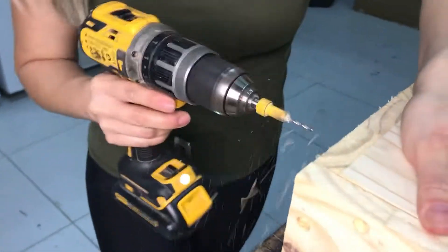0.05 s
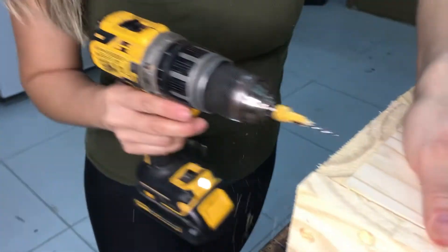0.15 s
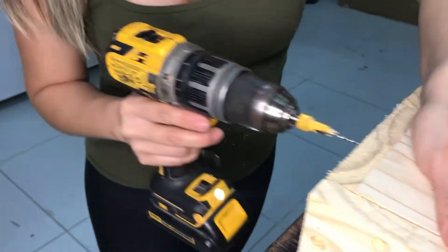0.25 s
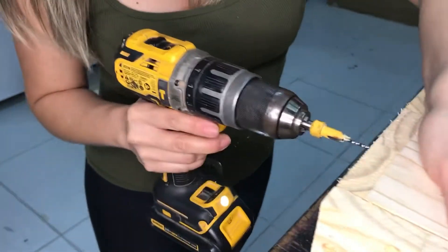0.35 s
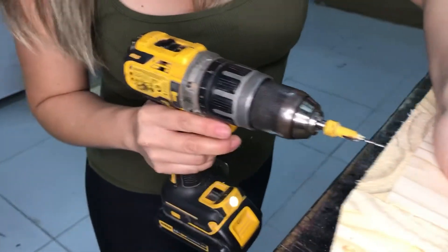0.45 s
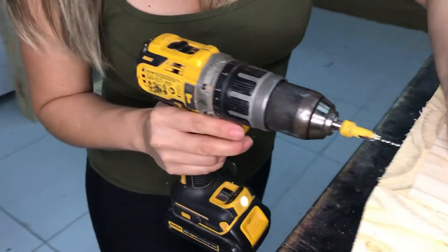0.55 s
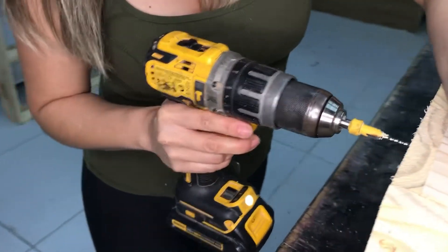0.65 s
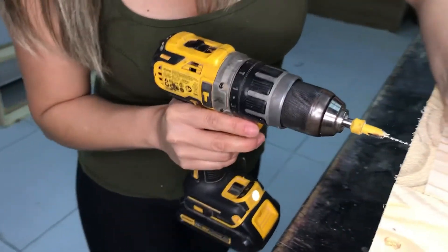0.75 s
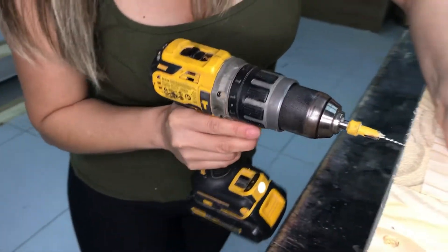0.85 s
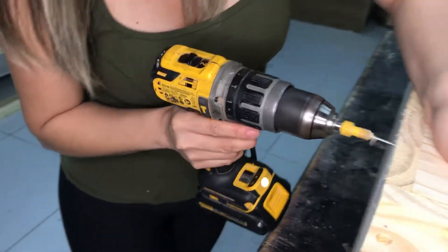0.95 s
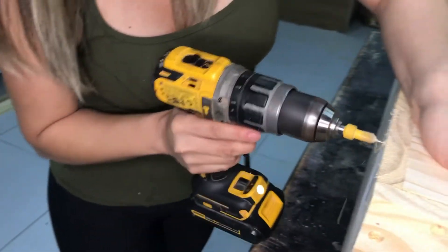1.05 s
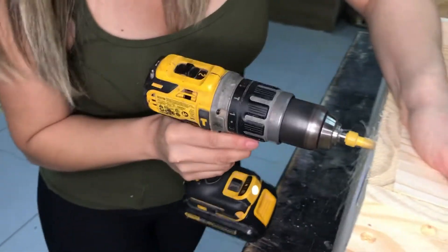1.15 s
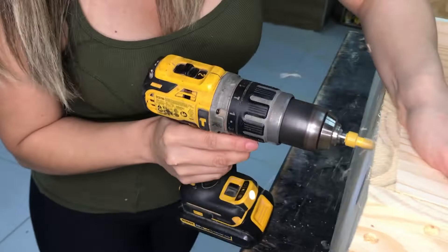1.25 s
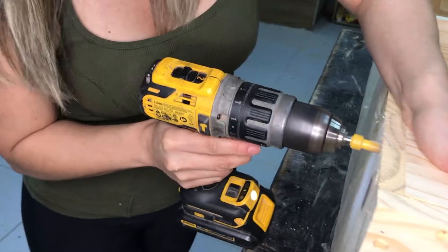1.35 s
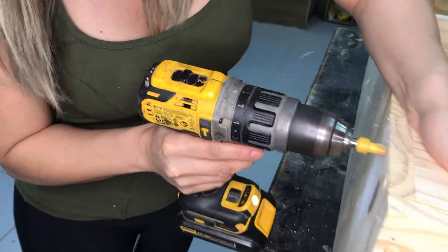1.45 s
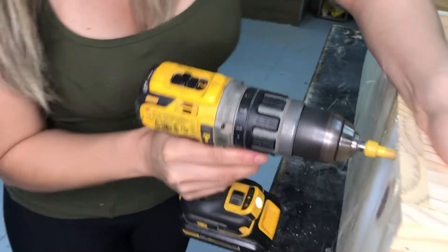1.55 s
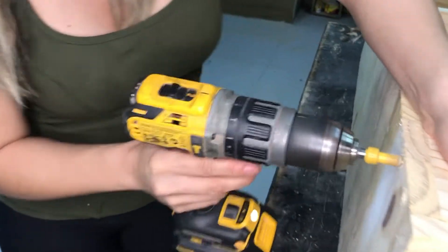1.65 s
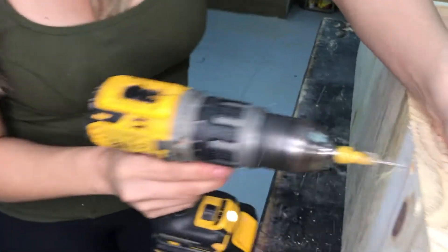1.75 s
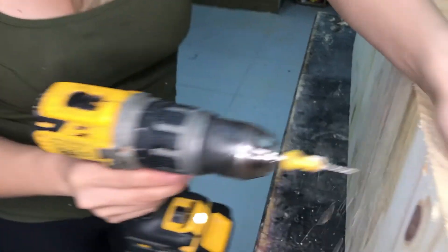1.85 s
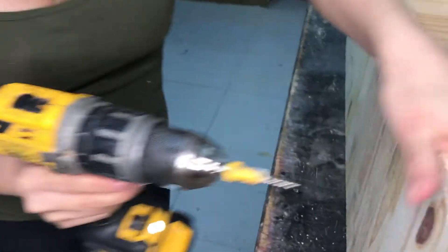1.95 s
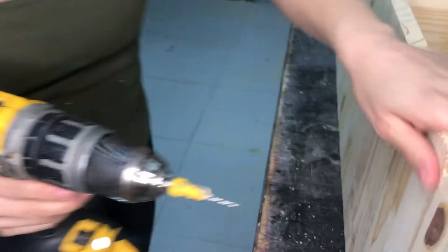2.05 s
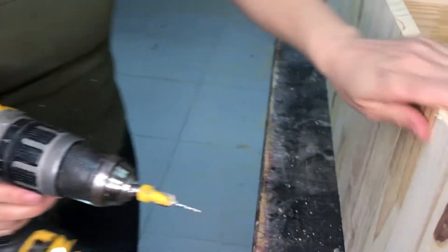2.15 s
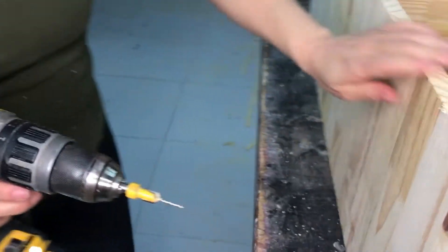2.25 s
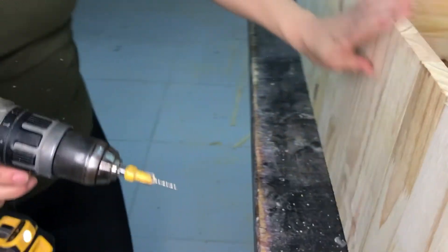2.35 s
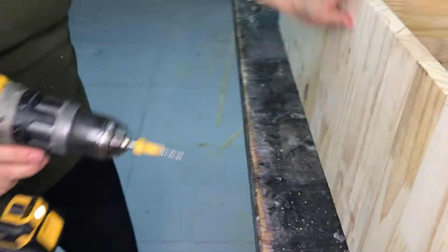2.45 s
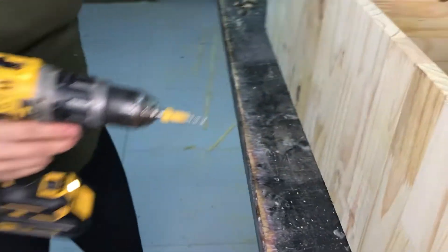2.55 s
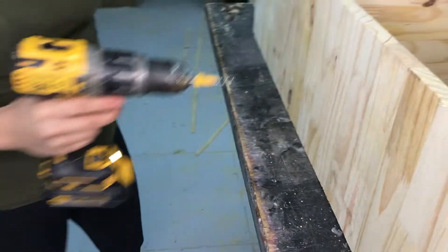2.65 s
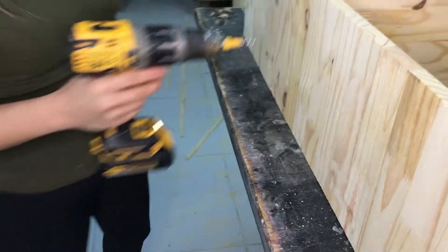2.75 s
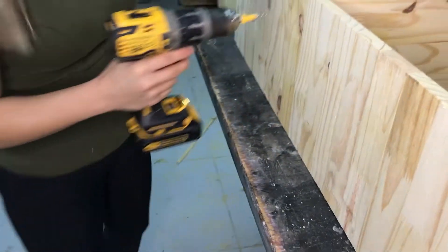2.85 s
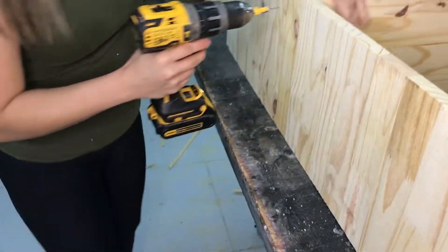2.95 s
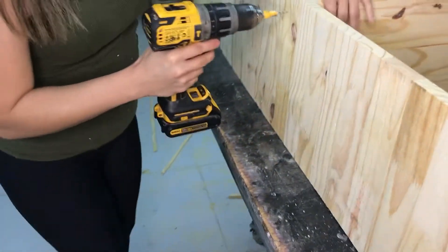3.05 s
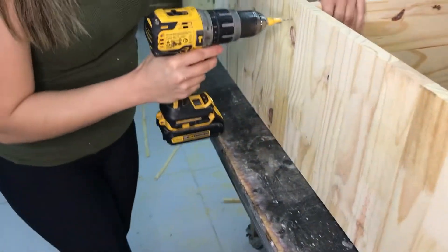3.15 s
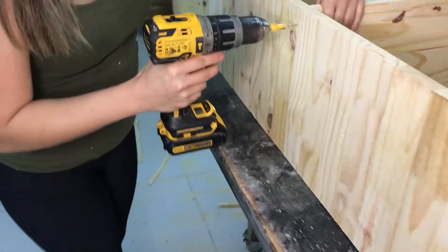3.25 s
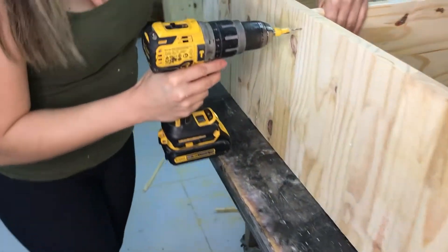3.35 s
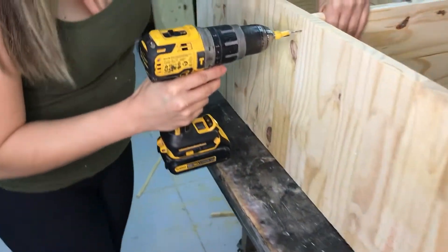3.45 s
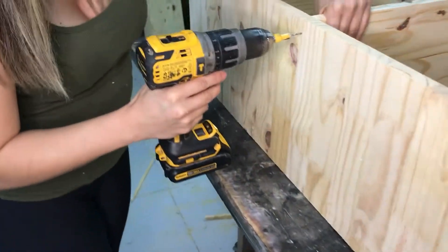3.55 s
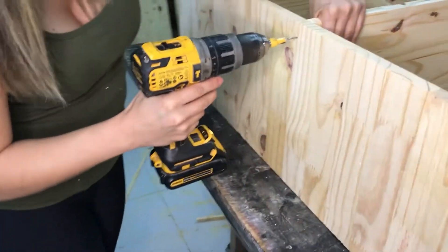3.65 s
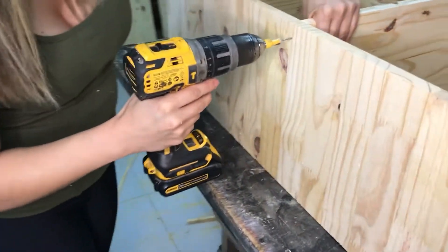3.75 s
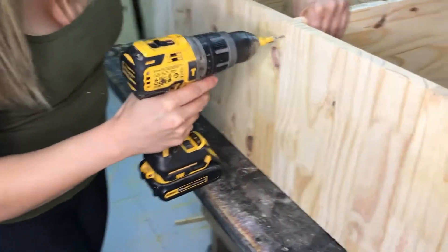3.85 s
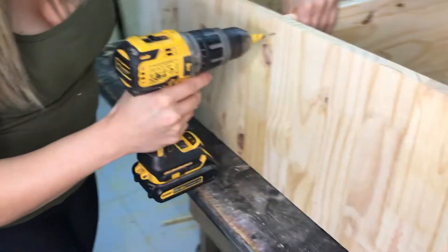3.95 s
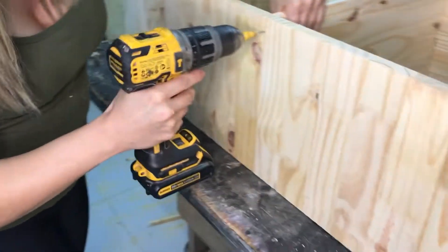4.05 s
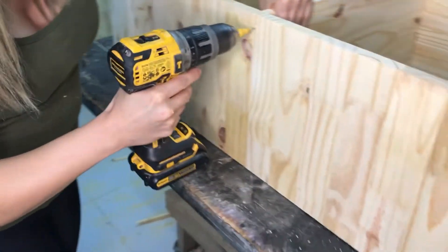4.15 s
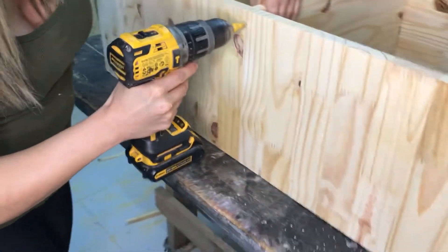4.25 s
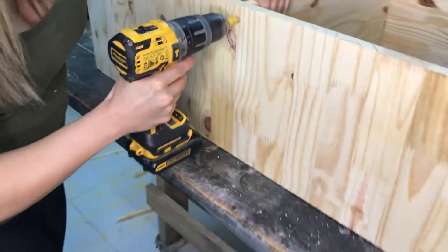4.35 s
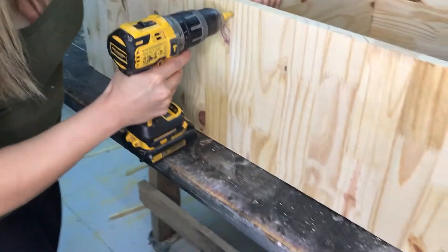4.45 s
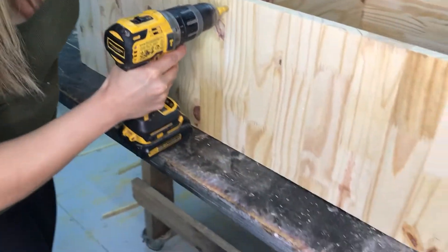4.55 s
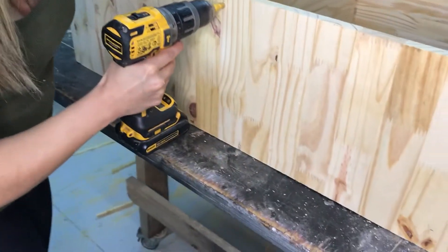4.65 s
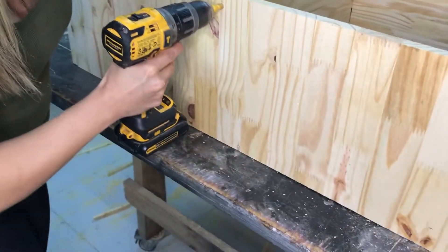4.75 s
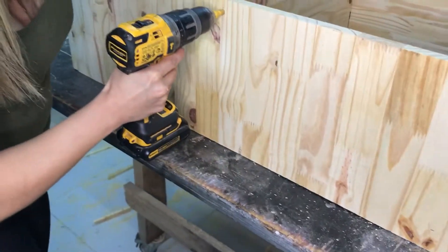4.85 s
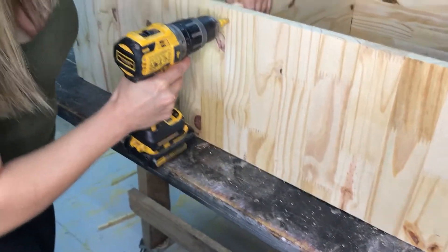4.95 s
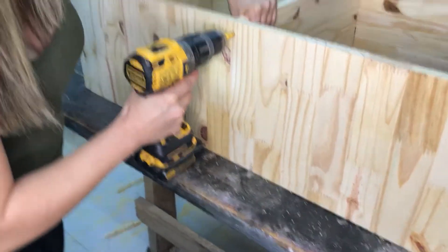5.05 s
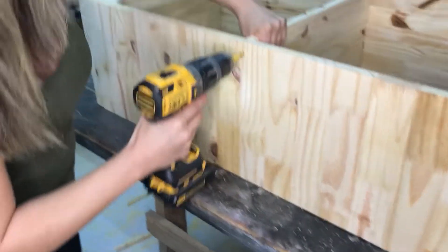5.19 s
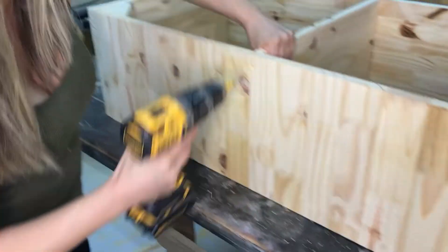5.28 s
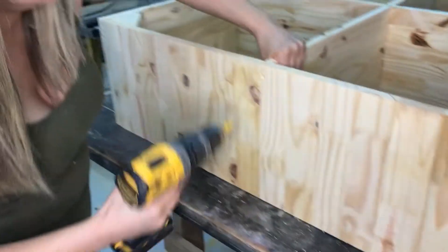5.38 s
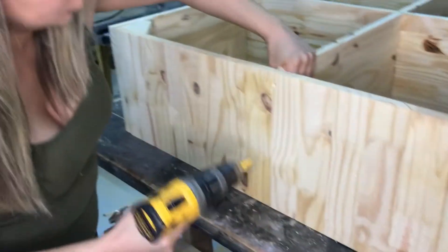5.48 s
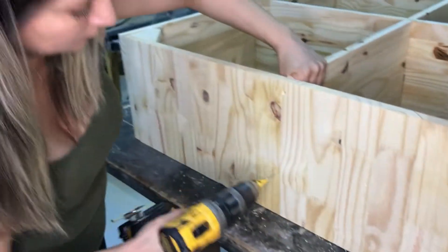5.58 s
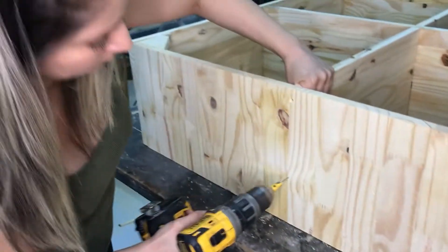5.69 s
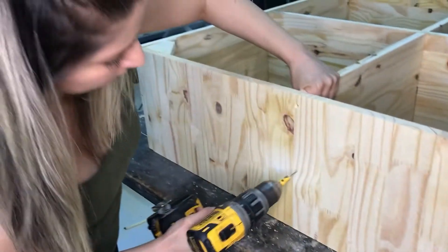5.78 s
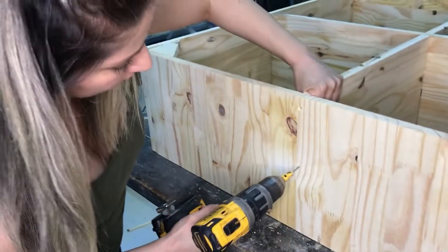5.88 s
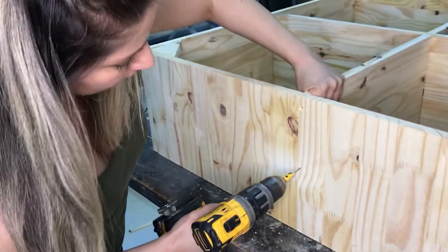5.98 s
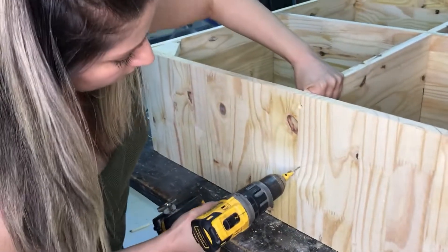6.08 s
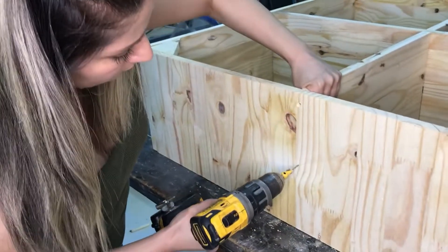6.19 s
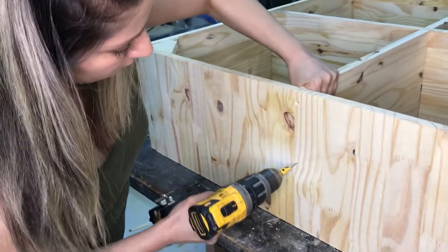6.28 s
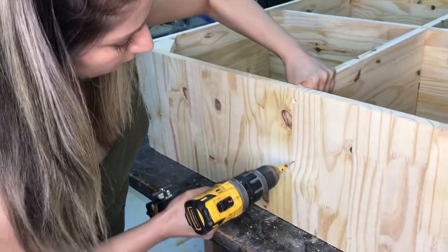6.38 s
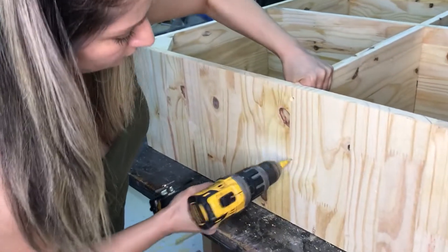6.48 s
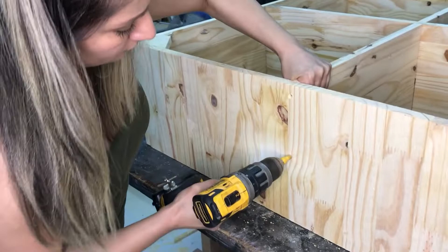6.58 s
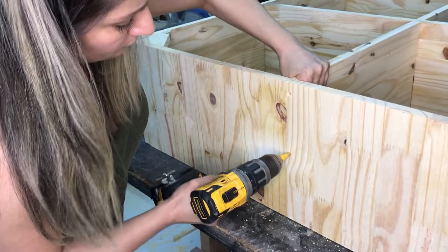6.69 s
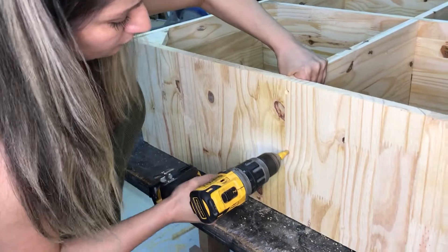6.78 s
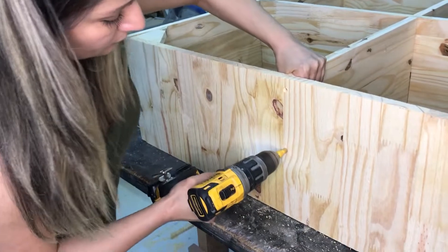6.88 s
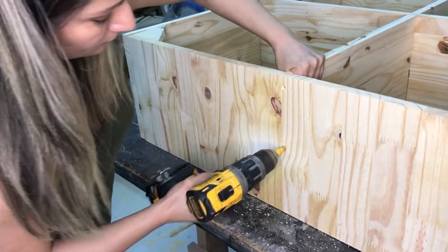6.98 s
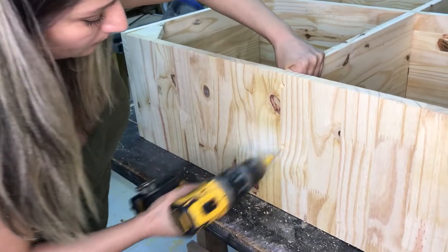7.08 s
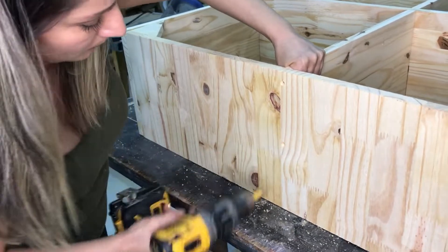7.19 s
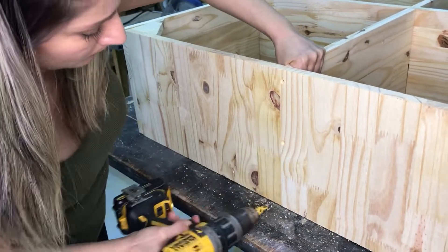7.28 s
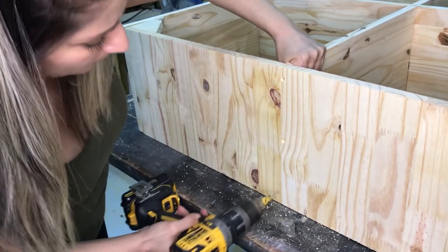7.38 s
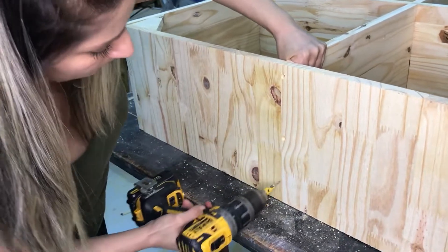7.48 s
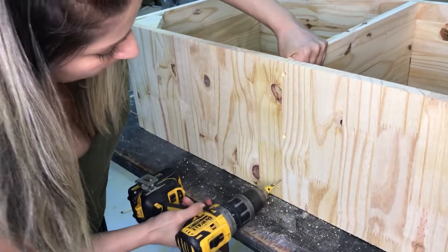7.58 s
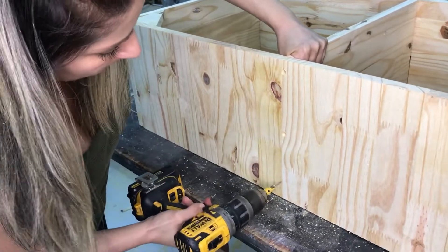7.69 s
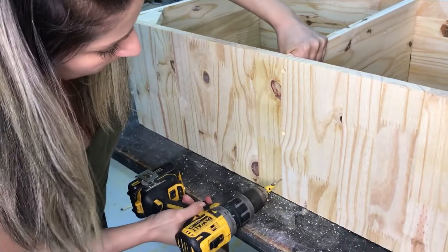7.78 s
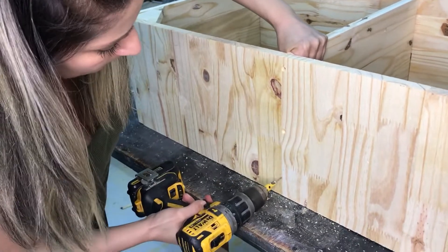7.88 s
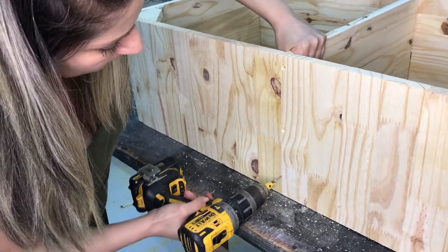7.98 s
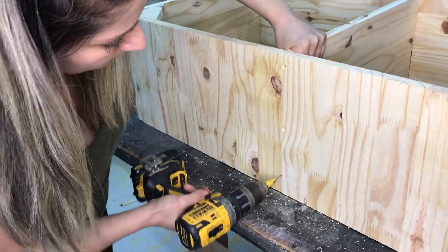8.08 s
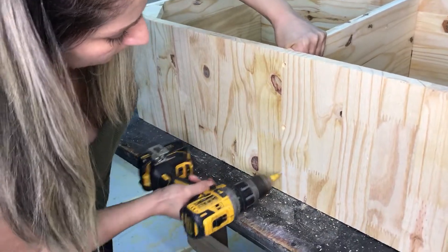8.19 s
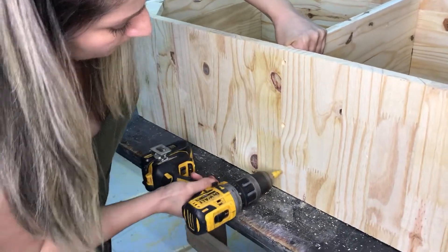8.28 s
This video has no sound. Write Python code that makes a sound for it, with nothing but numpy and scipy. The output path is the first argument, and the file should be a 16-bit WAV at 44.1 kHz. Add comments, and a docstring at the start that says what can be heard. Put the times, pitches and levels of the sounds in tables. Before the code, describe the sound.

Close in a workshop with faint steady room noise and sparse reflections, a cordless drill is just stopping: a dying whine and several clacks within 0.2 s. Soft rubs and light bit taps on wood follow. At 0.9 s it clicks and spins up in about a tenth of a second to a high thin whine over bright gritty gear rattle, biting strongest here, the boards buzzing low, until 1.65 s; loud clustered clacks end it by 1.83. Hand and shoe scuffs fill 2 to 3.8, with a wooden tap at 3.83. A longer, fuller rattling bore runs 3.9-5.2, stopping in hard knocks. Quiet scuffs, a tap at 6.23, then a shorter bore 6.35-7.05 with stop clacks to 7.25. A barely audible thin tone sags slightly from 7.55 to 8.03. After a tap at 7.95, the drill starts again at 8.03 and is still whining at the end.

```python
"""First comes the dying spin of a cordless drill, which then bores short holes into a pine cabinet.
The motor whines as sinusoids on its shaft orders, over gear rattle made of noise shaped by resonances.
The bit shakes the boards through panel modes, and the spindle lock clacks at each start and stop.
Hands and shoes scuff, the bit is set against the boards, and a faint thin tone sounds late on.
Sparse workshop reflections and steady room noise surround it all at one microphone."""
import sys
import numpy as np
from scipy import signal
from scipy.io import wavfile
from scipy.ndimage import uniform_filter1d

SR = 44100
rng = np.random.default_rng(int(sys.argv[2]) if len(sys.argv) > 2 else 0)


def dump_mix(stems):
    """Bounce the given channels to the path in sys.argv[1] as a 16-bit WAV at rate SR."""
    frames = np.atleast_2d(stems).T  # one column per channel
    limited = np.clip(frames, -1, 1)  # hard clip at full scale
    pcm = np.round(limited * 32767).astype(np.int16)
    wavfile.write(sys.argv[1], SR, pcm)


def field_ratio(decibels):
    """Amplitude ratio for a level in dB (20 dB per decade); scalars and array-likes work."""
    return 10 ** (np.asarray(decibels, dtype=float) / 20)


N = 367353  # samples

# Motor speed until the brake, one list per spin.
# Each row: time in seconds, mesh whine in Hz, whine level in dB before flare and flutter.
SPINS = [
    [(0, 10600, -36)],
    [(.94, 5500, -38), (.968, 6747, -38), (1.0, 9240, -28), (1.03, 10919, -24), (1.06, 11262, -23),
     (1.126, 11557, -29), (1.16, 11323, -30), (1.25, 11680, -23), (1.39, 11906, -22), (1.53, 11959, -24),
     (1.59, 12158, -28), (1.63, 12750, -26), (1.662, 11650, -28)],
    [(3.95, 3800, -50), (3.99, 6364, -38), (4.018, 9003, -29), (4.044, 10600, -28), (4.07, 11290, -28),
     (4.146, 11730, -28), (4.35, 11770, -30), (4.46, 11890, -25), (4.604, 11957, -27), (4.66, 11721, -32),
     (4.88, 11823, -32), (4.968, 11464, -24), (5.084, 11593, -32), (5.148, 12503, -24), (5.182, 11607, -29)],
    [(6.39, 4000, -50), (6.42, 5924, -41), (6.45, 7544, -33), (6.48, 9963, -29), (6.5, 10750, -30),
     (6.52, 11095, -30), (6.6, 11186, -29), (6.694, 11474, -24), (6.816, 11639, -26), (6.924, 11667, -25),
     (6.98, 11953, -29), (7.03, 12600, -28), (7.066, 11062, -28)],
    [(8.1, 4000, -54), (8.15, 6800, -40), (8.18, 8300, -36), (8.2, 8850, -29), (8.222, 9850, -30),
     (8.246, 10500, -29), (8.27, 10780, -24), (8.33, 11008, -24)],
]
TEETH = 23  # whine cycles per turn of the motor shaft
SHAFT_JITTER = .00087  # rms fraction of the speed
BRAKE_HZ_PER_S, BRAKE_S = 76000, .07  # fall of the whine under the brake
CREEP_HZ_PER_S, CREEP_S = 52000, .08  # slower fall after it
BRAKE_DB, BRAKE_POLE_DB = -8, -5  # fading of the whine, and of the pole orders re run-up

# Magnetic and gear orders of the motor.
# Each row: multiple of the shaft rate, level in dB re the pole level, flare at the housing's sharp ring in dB.
POLES = [(8, 0, 8), (4, -3, 0), (12, -11, 14), (3, -10, 0), (16, -14, 21), (10.5, -22, 27)]
# Pole orders, one row per spin.
# Each row: run-up in seconds, level at its end in dB, level at full speed in dB, lift of the fourth order in dB.
POLE_LEVELS = [(.01, -36, -36, 0), (.09, -35, -34, 2.5), (.07, -34, -34, -3), (.07, -35, -48, 3),
               (.12, -36, -37, 0)]
POLE_START_DB, POLE_SETTLE_S = -5, .09  # start re the end of the run-up; time to settle after it
SLOW_POLE_DB, FULL_HZ = 16, 10800  # away from the ring: loss per octave of whine below FULL_HZ
FLARE_HZ, FLARE_WIDTH_HZ, WHINE_FLARE_DB = 3580, 290, 11  # the housing's sharp ring

# Load on the bit, one list per pull.
# Each row: time in seconds, bite of the bit in the wood in dB, hum of the shaft order in dB.
LOADS = [
    [(0, -42, -70), (.09, -45, -70), (.2, -62, -70)],
    [(.897, -50, -68), (.98, -44, -62), (1.035, -24.5, -53), (1.13, -26, -53), (1.24, -27.5, -36),
     (1.34, -33, -38), (1.54, -28, -39), (1.66, -28, -52), (1.84, -40, -60), (1.88, -55, -60)],
    [(3.895, -44, -60), (3.98, -49, -52), (4.06, -42, -38), (4.16, -40, -32), (4.56, -40, -32.5),
     (4.7, -34, -32), (4.86, -40, -30), (4.96, -33, -34), (5.17, -40, -36), (5.31, -43, -62),
     (5.4, -59, -62)],
    [(6.347, -49, -66), (6.43, -49, -64), (6.52, -39, -56), (6.6, -33, -39), (6.8, -34, -40),
     (6.92, -36, -44), (7.02, -38, -33), (7.15, -42, -64), (7.28, -58, -64)],
    [(8.027, -45, -70), (8.13, -48, -62), (8.2, -32, -55), (8.26, -32, -54), (8.34, -33, -44)],
]
GRAB_DB, GRAB_SPAN_DB = -45, 10  # bite at which the bit begins to grab, and range to full grab
GRAB_TURNS, GRAB_FLUTTER_DB, GRAB_PULSE = .13, 2, .7  # phase jolt, level flutter, throb once a cut
CUTS_PER_TURN = .0812  # bites of the bit per turn of the motor shaft, through the gears

# Trigger pulls of the drill.
# Each row: squeeze in seconds, run-up in seconds, release in seconds,
# nominal gear rattle at first in dB, nominal rattle at full speed in dB.
PULLS = [(-1, .14, -.04, -40, -28), (.897, .12, 1.65, -31, -22), (3.895, .11, 5.17, -36, -23),
         (6.347, .13, 7.04, -40, -23), (8.027, .15, 9, -41, -21.5)]
SURGE_DB, SETTLE_S = 2, .15  # overshoot of the rattle at the end of the run-up
COAST_S, COAST_DB, HALT_S, HALT_DB = .19, -11, .045, -18  # sag while braking, then the halt
SLOW_TREBLE_DB, SLOW_HOUSING_DB = -9.5, 8.7  # slow gears are dull and boom in the housing
# Colour of the rattle as the drill is held, one list per pull. Each row: frequency in Hz, density in dB per Hz.
RATTLE = [
    [(350, -20), (600, -9), (1020, -9), (2160, -12.5), (2370, -11.5), (3920, -8), (4750, -16.5),
     (7040, -16), (15500, -28)],
    [(350, -20), (600, -10), (766, -13), (915, -7.5), (1180, -9.5), (1560, -6), (2160, -6), (2400, -4),
     (3820, -5), (4370, -4), (4940, -8.5), (6490, -5.5), (10600, -10), (11600, -9), (15500, -12)],
    [(100, -24), (350, -7), (600, -4.5), (1050, -8.5), (1530, -0.5), (2190, -2.5), (2400, 1), (3770, -0.5),
     (4200, 1), (4940, -4.5), (5980, -0.5), (7640, -3), (8630, -2), (10600, -6.5), (11600, -5),
     (15500, -9.5)],
    [(350, -35), (600, -8), (716, -21), (878, -15), (1220, -21.5), (1530, -12), (2220, -11), (2950, -7.5),
     (4090, -11), (4620, -10), (7740, -15.5), (9240, -13), (10300, -19), (11600, -16.5), (15500, -20.5)],
    [(350, -21), (600, -6.5), (1150, -16), (1380, -7), (2220, -7), (2400, -3), (3660, -1), (4260, -3.5),
     (7430, -7), (11000, -11), (15500, -15)],
]
# Main resonance of the gear housing. The row: frequency in Hz, width in Hz.
HOUSING = (3800, 540)
# Narrow resonances of the plastic shell. Each row: frequency in Hz, width in Hz, lift in dB.
SHELL = [(922, 69, 4), (1533, 60, 2.5), (2190, 70, -4.5), (2466, 44, 3.5), (2480, 40, -0.5), (3000, 78, 2),
         (3180, 50, 4.5), (3490, 74, 4.5), (3790, 48, 2.5), (4470, 90, 2.5), (4750, 70, 1),
         (6300, 150, 2.5), (8500, 200, 2)]
PATCHY_DB = 1.8  # rms swell of narrow rattle bands

# Cabinet panels shaken by the bit, one list per pull.
# Each row: frequency in Hz, width of the first resonator in Hz, relative level in dB.
PANELS = [
    [(90, 40, -10), (210, 60, 6), (600, 180, -8)],
    [(78, 33, -14), (206, 30, -0.5), (315, 31, -8.5), (566, 170, -7.5)],
    [(90, 32, -19), (177, 60, -8), (576, 110, 15)],
    [(98, 16, -4), (196, 55, -1), (497, 250, 6)],
    [(107, 32, -12), (195, 95, 0.5), (532, 130, 0)],
]
# Beat of the cutting edges, one list per pull. Each row: multiple of the cut rate, level in dB re the bite.
BEATS = [
    [],
    [(2, -11), (3, -27), (4, -13), (5, -13), (6, -12.5), (8, -13.5), (10, -16), (11, -16), (14, -11)],
    [(2, -12), (3, -26), (4, -4), (5, -24), (6, -6.5), (8, -20), (14, -10.5), (15, -10.5)],
    [(2, -10), (4, -4.5), (6, -5), (8, -15), (13, -13)],
    [(3, -10), (5, -5.5), (7, -11.5), (14, -10.5)],
]

# Steady room noise. Each row: frequency in Hz, relative density in dB per Hz.
AIR = [(18, -53), (26, -14), (32, 3), (50, -8.5), (120, -9.5), (309, -18), (371, -20.5), (508, -16.5),
       (677, -17), (1090, -20), (1240, -26), (1450, -21), (1690, -22), (2260, -19), (4960, -23),
       (5800, -23.5), (15700, -34.5)]
AIR_DB = -47.6  # rms
# Decay of the workshop reflections. Each row: frequency in Hz, t60 in seconds.
SHOP = [(100, 0.15), (500, 1), (1500, 1), (4000, 0.77), (8000, 0.74), (14000, 0.3)]
SHOP_DB = -12.5  # energy of the reflections re the direct sound

# Knocks of gear play and spindle lock. Each row: start in seconds, peak in dB.
CLACKS = [(.009, -13), (.068, -15), (.108, -19), (.177, -30), (.8965, -20), (.944, -18), (1.684, -9),
          (1.713, -9), (1.719, -8), (1.7495, -6), (1.8075, -5), (1.829, -22), (3.88, -31), (3.896, -25),
          (5.225, -12), (5.2525, -6), (5.288, -13), (5.309, -18), (6.346, -27), (6.402, -19), (7.091, -14),
          (7.116, -8), (7.123, -12), (7.151, -7), (7.196, -19), (7.205, -10.5), (7.228, -21), (8.027, -25),
          (8.05, -24)]
# Knocks that set the chuck steel ringing.
# Each row: start in seconds, peak in dB, gain of the steel modes against the gearbox modes in dB.
PINGS = [(.9115, -12, 0), (3.914, -17, 3), (6.367, -13, -15), (7.2455, -16, -17)]
CLACK_S, CLACK_STEEL_DB, PING_S = .003, -29, .0025  # impact decay, steel gain, ping impact decay
# Modes of the damped gearbox. Each row: frequency in Hz, level in dB, t60 in seconds.
GEARBOX = [(1600, -11, .005), (2000, -6, .006), (2600, -3, .006), (3100, -1, .007), (3600, 0, .008),
           (4200, 0, .006), (5000, -3, .004), (6000, -2, .004), (7000, -2, .003), (8500, -3, .003),
           (10500, -5, .002), (13000, -8, .002)]
# Modes of the chuck steel. Each row: frequency in Hz, level in dB, t60 in seconds.
STEEL = [(7550, -5, .04), (10030, 0, .08), (11770, -1, .05)]

# Rubs of hands and shoes.
# Each row: start in seconds, nominal peak in dB, centre in Hz, decay constant in seconds.
SCUFFS = [(.30, -42, 3800, .093), (.84, -44, 4270, .08), (2.02, -40, 2500, .06), (2.16, -39.5, 2400, .08),
          (2.17, -41, 990, .06), (2.25, -42.5, 1500, .15), (2.31, -38, 2530, .023),
          (2.425, -36.5, 1900, .045), (2.5, -43, 2000, .08), (2.986, -35.5, 1750, .06),
          (3.07, -36.5, 1170, .031), (3.281, -30, 6800, .006), (3.295, -43, 2420, .093),
          (3.54, -47, 3520, .076), (3.673, -47, 9500, .015), (3.78, -40, 6300, .034),
          (3.824, -43.5, 9000, .004), (5.58, -47, 10500, .02), (5.975, -47, 8500, .044),
          (6.05, -41.5, 3000, .044), (6.1, -42, 11000, .01)]
SCUFF_WIDTH_HZ, SCUFF_WIDENS = 1100, .6  # width at 1500 Hz, and its power law

# Bit tip set against a board. Each row: start in seconds, knock peak in dB, steel tick in dB re that peak.
TOUCHES = [(0.511, -41, 0), (0.698, -35, -7), (3.827, -28.5, -6), (6.228, -31, 0.5), (7.954, -31.5, -1.5)]
# Modes of the board. Each row: frequency in Hz, level in dB, t60 in seconds.
BOARD = [(92.6, 1, 0.17), (185, -3, .15), (244.5, -2, 0.39), (345, -4, 0.12), (490, -11, 0.24),
         (635, -5, 0.086)]

# A faint thin tone. Each row: time in seconds, frequency in Hz, mean level in dB.
THIN_TONE = [(7.55, 2240, -68), (7.62, 2200, -61), (7.7, 2130, -62), (7.78, 2070, -61), (7.9, 2060, -62),
             (8.03, 2070, -64)]

EDGE_HZ = 15850  # upper band limit, where the treble ends


def evened(x):
    """Normalisation: a signal divided by its root mean square has unit power."""
    return x / np.sqrt(np.mean(x ** 2) + 1e-20)


def read(points, hz):
    """Spectral interpolation: values are read along a logarithmic frequency axis."""
    f, value = np.transpose(points)
    return np.interp(np.log(hz + 1), np.log(f + 1), value)


def add(mix, s, sound):
    """Superposition: pressures add, from a given start in seconds."""
    part = mix[max(round(s * SR), 0):][:len(sound)]
    part += sound[:len(part)]


def unroll(rows):
    """Linear interpolation: returns the start of a curve and each of its columns, sample by sample."""
    s, *columns = np.transpose(rows)
    t = np.arange(s[0], s[-1], 1 / SR)
    return s[0], [np.interp(t, s, column) for column in columns]


def wander(count, hz):
    """Low-pass noise: a one-pole filter turns white noise into slow fluctuation of rms 1."""
    lead_in = SR // 4  # lets the filter settle
    noise = rng.standard_normal(count + lead_in)
    slow = signal.lfilter([1], [1, -np.exp(-2 * np.pi * hz / SR)], noise)
    return evened(slow[lead_in:])


def resonate(x, hz, width):
    """Resonance: one complex pole answers with about unit gain at its centre."""
    r = np.exp(-np.pi * width / SR)
    return 2 * signal.lfilter([1 - r], [1, -r * np.exp(2j * np.pi * hz / SR)], x).real


def ring(modes, spread):
    """Modal decay: a blow excites damped sinusoids, each with its own chance level and detuning."""
    t = np.arange(SR // 4) / SR
    sound = np.zeros(len(t))
    luck = rng.standard_normal((len(modes), 2)) * [2.5, spread]  # dB, fraction of the frequency
    for (hz, db, t60), (luck_db, detune) in zip(modes, luck):
        decay = field_ratio(db + luck_db - 60 * t / t60)
        sound += decay * np.sin(2 * np.pi * hz * (1 + detune) * t)
    return sound


def braked(rows):
    """Deceleration: a spin is followed by the brake's steady fall and a slower creep."""
    s, hz, db = rows[-1]
    low_hz = hz - BRAKE_HZ_PER_S * BRAKE_S
    slowed = (s + BRAKE_S, low_hz, db + BRAKE_DB)
    crept = (s + BRAKE_S + CREEP_S, low_hz - CREEP_HZ_PER_S * CREEP_S, db + 2 * BRAKE_DB)
    return [*rows, slowed, crept]


def shaft_turns():
    """Phase as the integral of speed: motor shaft turns so far, at every sample."""
    s, hz = np.vstack([braked(rows) for rows in SPINS])[:, :2].T
    turns_per_s = np.interp(np.arange(N) / SR, s, hz) / TEETH
    return np.cumsum(turns_per_s * (1 + SHAFT_JITTER * wander(N, 63))) / SR


def motor(rows, poles, load, shaft):
    """Order excitation: tones at fixed multiples of shaft speed; the shaft order roughens under load."""
    s, (hz, whine_db) = unroll(braked(rows))
    turns = shaft[round(s * SR):][:len(hz)]
    count = len(turns)
    t, hz, whine_db = s + np.arange(count) / SR, hz[:count], whine_db[:count]
    run_up, up_db, full_db, fourth_db = poles
    brake = rows[-1][0]

    pole_db = np.interp(t - s, [0, run_up, run_up + POLE_SETTLE_S], [up_db + POLE_START_DB, up_db, full_db])
    if brake < N / SR - BRAKE_S:
        fade = np.clip((t - brake) / BRAKE_S + 1, 0, 1)  # complete as the brake begins
        pole_db += (BRAKE_POLE_DB + up_db - pole_db) * fade

    at, bite_db, shaft_db = np.transpose(load)
    grab = np.clip((np.interp(t, at, bite_db) - GRAB_DB) / GRAB_SPAN_DB, 0, 1)
    flutter_db = (2.5 + GRAB_FLUTTER_DB * grab) * np.clip(wander(count, 25), -2.5, 1.2)
    jolted = turns + GRAB_TURNS * grab * wander(count, 35)
    tone = field_ratio(np.interp(t, at, shaft_db) + flutter_db) * np.sin(2 * np.pi * jolted)
    cuts = CUTS_PER_TURN * turns + .15 * wander(count, 8)
    tone *= 1 + GRAB_PULSE * grab * np.cos(2 * np.pi * cuts)

    slow_db = SLOW_POLE_DB * np.log2(np.minimum(hz / FULL_HZ, 1))
    orders = [(TEETH, whine_db, WHINE_FLARE_DB, 3)]  # multiple, level dB, flare dB, flutter dB
    orders += [(k, pole_db + db + fourth_db * (k == 4), flare_db, 2.5) for k, db, flare_db in POLES]
    for k, db, flare_db, flutter_db in orders:
        near = np.exp(-((k * hz / TEETH - FLARE_HZ) / FLARE_WIDTH_HZ) ** 2)
        colour_db = flare_db * near
        if k != TEETH:
            colour_db = colour_db + slow_db * (1 - near)
        level = field_ratio(db + colour_db + flutter_db * wander(count, 22))
        tone += level * np.sin(2 * np.pi * (k * turns + rng.random()))
    return s, np.sqrt(2) * tone * signal.windows.tukey(count, .03)


def trigger(t, squeeze, run_up, release, first_db, full_db):
    """Speed-dependent excitation: rattle level, treble and housing boom follow the gears' run-up and halt."""
    up = np.clip((t - squeeze) / run_up, 0, 1)
    down = np.clip((t - release) / COAST_S, 0, 1)
    surge_db = SURGE_DB * up * np.exp(-np.maximum(t - squeeze - run_up, 0) / SETTLE_S)
    halt_db = HALT_DB * np.maximum(t - release - COAST_S, 0) / HALT_S
    level_db = first_db + (full_db - first_db) * up ** .8 + surge_db + COAST_DB * down + halt_db
    slow = 1 - up + down ** .7
    return level_db, SLOW_TREBLE_DB * slow, SLOW_HOUSING_DB * slow


def rattle(level_db, treble_db, housing_db, colour):
    """Random impacts through resonances: uneven tooth knocks excite the housing and its shell."""
    count = len(level_db)
    uneven_db = np.minimum(rng.exponential(1, count), 5) + 1.25 * wander(count, 160)
    knocks = rng.standard_normal(count) * field_ratio(uneven_db)
    hz, t, z = signal.stft(knocks, SR, nperseg=1024, noverlap=768)

    def per_frame(db):
        """Relative level: departure from the median, read at each frame."""
        return np.interp(t * SR, np.arange(count), db - np.median(db))

    top = np.clip(np.log(hz / 4500 + 1e-9) / np.log(14000 / 4500), 0, 1)
    peak = np.exp(-((hz - HOUSING[0]) / HOUSING[1]) ** 2)
    shell_db = sum(db * np.exp(-((hz - f) / width) ** 2) for f, width, db in SHELL)
    steady_db = (read(colour, hz) + shell_db)[:, None]
    shape = field_ratio(steady_db + top[:, None] * per_frame(treble_db) + peak[:, None] * per_frame(housing_db))
    patches = uniform_filter1d(rng.standard_normal(shape.shape), size=3, axis=0)
    shape *= field_ratio(PATCHY_DB * evened(uniform_filter1d(patches, size=16, axis=1)))
    band = (hz > 1500) & (hz < 8000)
    shape /= np.sqrt((shape[band] ** 2).sum(0) / len(hz))  # the level holds while the colour moves
    shaped = signal.istft(z * shape, SR, nperseg=1024, noverlap=768)[1][:count]
    return field_ratio(level_db + 0.2) * shaped / knocks.std()


def bite(level_db, turns, panels, beats):
    """Forced vibration: edges beat in step with the shaft while chatter noise drives the panel modes."""
    count = len(level_db)
    chatter = rng.standard_normal(count)
    shaken = np.zeros(count)
    for hz, width, db in panels:
        mode = resonate(resonate(chatter, hz, width), hz, 1.2 * width)
        shaken += field_ratio(db) * evened(mode)
    beat = np.zeros(count)
    for k, db in beats:
        level = field_ratio(db + 3.5 * wander(count, 7.7))
        cycles = k * CUTS_PER_TURN * turns + 0.088 * wander(count, 7.7) + rng.random()
        beat += level * np.sin(2 * np.pi * cycles)
    shaken = signal.sosfilt(signal.butter(3, 60, "high", fs=SR, output="sos"), shaken)
    return field_ratio(level_db) * (field_ratio(-2) * evened(shaken) + np.sqrt(2) * beat)


def air():
    """Stationary noise: random spectra under a fixed envelope, with soft drifting patches."""
    frames, hz = N // 256 + 5, np.fft.rfftfreq(1024, 1 / SR)
    real, imaginary, patches = rng.standard_normal((frames, 513, 3)).T
    patches = evened(uniform_filter1d(uniform_filter1d(patches, 20, 0), 20, 1))
    z = (real + 1j * imaginary) * field_ratio(read(AIR, hz)[:, None] + 1.6 * patches)
    return field_ratio(AIR_DB) * evened(signal.istft(z, nperseg=1024, noverlap=768)[1][:N])


def shop(x):
    """Reverberation: sparse reflections of random sign decay at a rate set by frequency."""
    taps = np.zeros(SR)
    at = np.arange(200, SR - 20, 20)
    taps[at + rng.integers(0, 20, len(at))] = rng.choice([-1., 1.], len(at))
    hz, t, z = signal.stft(taps, SR, nperseg=256)
    decay = field_ratio(-60 * t / read(SHOP, hz)[:, None])
    tail = signal.istft(z * decay, SR, nperseg=256)[1]
    return signal.fftconvolve(x, tail / np.linalg.norm(tail))[:N]


def clack(peak_db, steel_db, length):
    """Impact excitation: a quick swelling run of blows drives damped gearbox modes and longer steel ones."""
    u = np.arange(SR // 30) / SR / length
    uneven = field_ratio(5 * np.minimum(rng.exponential(1, len(u)), 4))
    impacts = rng.standard_normal(len(u)) * u ** 0.52 * np.exp(-u) * uneven
    modes = ring(GEARBOX, 0.045) + field_ratio(steel_db) * ring(STEEL, 0.0033)
    sound = signal.fftconvolve(impacts, modes)
    sound[:len(u)] += 0.55 * impacts  # the blows themselves
    sound = signal.sosfilt(signal.butter(3, 1350, "high", fs=SR, output="sos"), sound)
    return field_ratio(peak_db) * sound / abs(sound).max()


def scuff(peak_db, hz, length):
    """Friction noise: uneven grains through a broad resonance, quick to start and slower to fade."""
    t = np.arange(SR // 3) / SR
    width = SCUFF_WIDTH_HZ * (hz / 1500) ** SCUFF_WIDENS
    grains = rng.standard_normal(len(t)) * field_ratio(1.7 * np.minimum(rng.exponential(1, len(t)), 4))
    rub = evened(resonate(resonate(grains, hz, width), hz, 2 * width))
    shape = (1 - np.exp(-t / 0.0008)) * np.exp(-t / length)
    return field_ratio(peak_db - 5.5) * rub * shape  # from nominal peak to rms


def touch(peak_db, tick_db):
    """Struck plate: the bit tip excites the board's low modes, with a small steel tick."""
    knock = ring(BOARD, .04)
    tick = np.pad(clack(peak_db + tick_db, -19, 0.0058), (0, SR))[:len(knock)]
    return field_ratio(peak_db) * knock / abs(knock).max() + tick


def thin_tone():
    """Modulated sinusoid: one faint tone wavers in pitch and level."""
    s, (hz, db) = unroll(THIN_TONE)
    wobble = 1 + .006 * wander(len(hz), 40)
    level = field_ratio(db + 3 * wander(len(hz), 20))
    return s, np.sqrt(2) * level * np.sin(2 * np.pi * np.cumsum(hz * wobble) / SR)


def scene():
    """Linear superposition: all sources share the workshop and one microphone."""
    mix, shaft = np.zeros(N), shaft_turns()
    for pull, load, colour, panels, beats in zip(PULLS, LOADS, RATTLE, PANELS, BEATS):
        s, (bite_db, _) = unroll(load)
        turns = np.resize(shaft[round(s * SR):], len(bite_db))
        add(mix, s, bite(bite_db, turns, panels, beats))
        s, end = max(pull[0], 0), min(pull[2] + COAST_S + HALT_S, N / SR)
        add(mix, s, rattle(*trigger(np.arange(s, end, 1 / SR), *pull), colour))
    for rows, poles, load in zip(SPINS, POLE_LEVELS, LOADS):
        add(mix, *motor(rows, poles, load, shaft))
    for s, db in CLACKS:
        add(mix, s, clack(db, CLACK_STEEL_DB, CLACK_S))
    for s, db, steel_db in PINGS:
        add(mix, s, clack(db, steel_db, PING_S))
    for s, *row in SCUFFS:
        add(mix, s, scuff(*row))
    for s, *row in TOUCHES:
        add(mix, s, touch(*row))
    add(mix, *thin_tone())
    heard = mix + field_ratio(SHOP_DB) * shop(mix) + air()
    return np.tile(heard, (2, 1))  # the same in both channels


def band_limit(x):
    """A steep low-pass at the top of the band."""
    return signal.sosfilt(signal.butter(12, 16870, fs=SR, output="sos"), x)


def record(dry):
    """Band limitation: the microphone rolls off the bass, and the extreme treble is cut."""
    thinned = signal.sosfilt(signal.butter(4, 32, "high", fs=SR, output="sos"), dry)
    edge = signal.firwin(401, EDGE_HZ, window=("kaiser", 9), fs=SR)
    mix = signal.oaconvolve(thinned, edge[None], "same")
    return band_limit(mix)


dry = scene()
out = record(dry)
dump_mix(out)
```